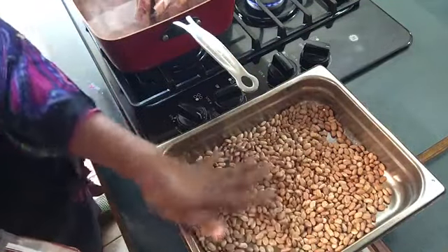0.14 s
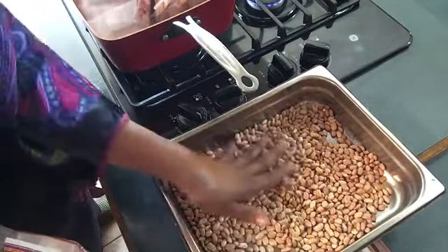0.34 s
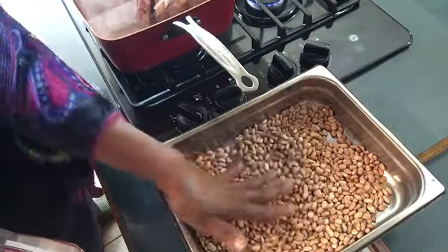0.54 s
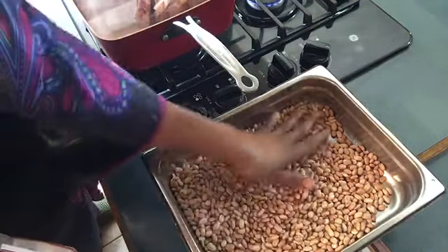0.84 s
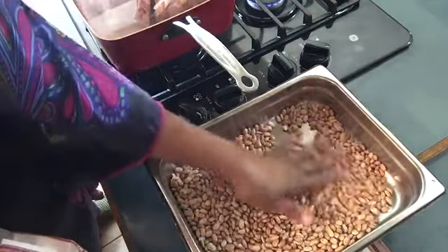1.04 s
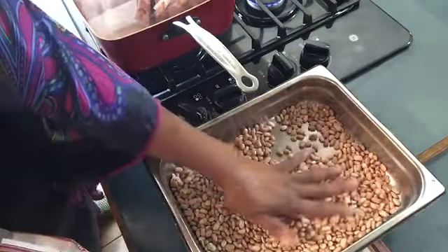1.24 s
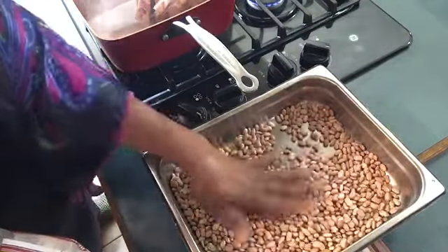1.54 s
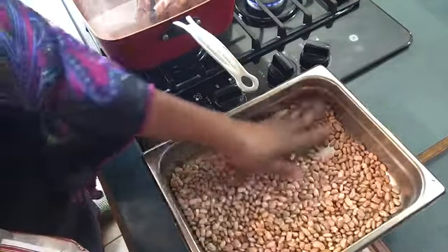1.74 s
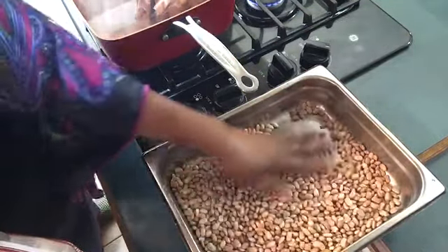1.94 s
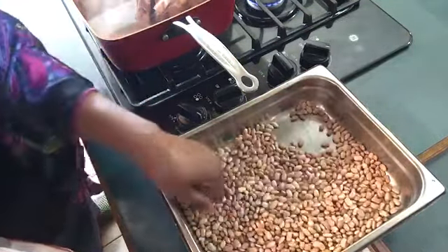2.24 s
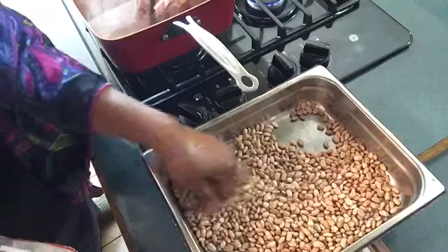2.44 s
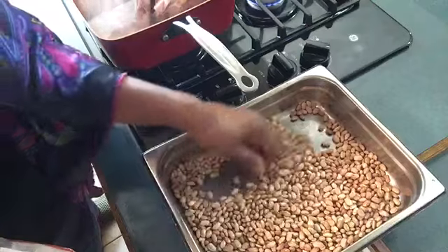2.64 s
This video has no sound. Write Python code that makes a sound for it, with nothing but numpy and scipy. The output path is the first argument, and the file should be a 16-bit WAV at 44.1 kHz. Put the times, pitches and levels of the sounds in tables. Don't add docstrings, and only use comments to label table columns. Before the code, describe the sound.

A hand stirs dry beans in a metal tray, with rustling clicks, sharp knocks and soft thuds

```python
import sys
import numpy as np
from scipy import signal
from scipy.fft import rfft, irfft
from scipy.io import wavfile
from scipy.ndimage import uniform_filter1d

SR = 44100
rng = np.random.default_rng(int(sys.argv[2]) if len(sys.argv) > 2 else 0)


def volts(x):
    e = np.asarray(x, float) / 20
    return 10 ** e


def wav_out(sig):
    wavfile.write(sys.argv[1], SR, np.round(np.clip(np.atleast_2d(sig).T, -1, 1) * 32767).astype(np.int16))


N = 123479

# [t/s, peak level/dB, length of push/s, boom f/Hz, boom level/dB]
LANDINGS = [
    (.202, -23.5, 0.034, 120.8, -22.5),
    (0.769, -20.5, 0.026, 123, -23.5),
    (1.757, -21.5, 0.025, 155.8, -18),
    (2.214, -25, 0.0059, 160, -45),
    (2.349, -24, 0.011, 160.5, -20.5),
]
SLOW_BELOW_HZ = 505


def rms_one(x):
    return x / np.sqrt(np.mean(x ** 2) + 1e-20)


def at_hz(points, hz):
    f, db = np.array(points)[:, 0], np.array(points)[:, 1]
    return np.interp(np.log(hz), np.log(f), db)


def drift(rate):
    r = np.exp(-2 * np.pi * rate / SR)
    noise = rng.standard_normal(N + SR)
    return rms_one(signal.lfilter([1], [1, -2 * r, r * r], noise)[SR:])


def resonate(x, hz, width_hz):
    r = np.exp(-np.pi * width_hz / SR)
    feedback = [1, -2 * r * np.cos(2 * np.pi * hz / SR), r * r]
    return signal.lfilter(np.array([1, 0, -1]) * (1 - r * r) / 2, feedback, x + 1e-18)


def ring(clicks, hz, t60):
    r = volts(-60 / (t60 * SR))
    w = 2 * np.pi * hz / SR
    return signal.lfilter([0, np.sin(w)], [1, -2 * r * np.cos(w), r * r], clicks + 1e-18)


def air():
    # [f/Hz, level/dB per Hz]
    air_colour = [(25, 15), (45, 1), (200, -0.5), (320, -1), (600, 1), (3000, -5), (6500, -18),
                  (10000, -30), (16000, -23)]
    hz = np.maximum(np.fft.rfftfreq(N, 1 / SR), 25)
    spectrum = rfft(rng.standard_normal(N)) * volts(at_hz(air_colour, hz))
    return volts(-58) * rms_one(irfft(spectrum, N))


def contacts(where, sizes, tilt_db, scatter, rattle, wander=.45, flip_every=1, rattle_db=-8.0):
    # [f/Hz, level/dB per Hz]
    bean_colour = [(210, -41), (350, -42), (398, -37), (575, -14), (2890, -1.5), (6640, -11.5),
                   (10400, -22), (12800, -17), (16000, -31)]
    # [f/Hz, width/Hz, boost/dB]
    pan_peaks = [(1114, 140, 2.5), (1670, 430, 6), (2820, 230, 5.5), (4094, 740, 6), (4780, 300, -5.5),
                 (5520, 360, 4.5), (6600, 310, 5.5), (11000, 1200, -2.5), (13800, 2000, -0.5)]
    bean_body_hz, tilt_pivot_hz = 1300, 3330
    ring_cycles, colour_scatter_db = 10.2, 5

    late = .0016 * rattle
    late[:, 0] = 0
    is_echo = late > 0
    touches = np.minimum(np.c_[where] + (late * SR).astype(int), N - 1).ravel()
    share = volts(rattle_db * is_echo - 5.0 * rattle * is_echo)
    share = share * np.sign(np.cos(1e3 * rattle * is_echo))

    out = np.zeros(N)
    for k, hz in enumerate(np.geomspace(380, 16000, scatter.shape[1])):
        mirrored_hz = max(hz, bean_body_hz ** 2 / hz)
        lean = tilt_db * np.clip(np.log2(mirrored_hz / tilt_pivot_hz), -1, 2)
        strength = sizes * volts(lean + colour_scatter_db * scatter[:, k])
        clicks = np.bincount(touches, (np.c_[strength] * share).ravel(), N)
        sign = (-1) ** (k // flip_every)
        out += sign * volts(at_hz(bean_colour, hz)) * resonate(clicks, hz, 1.71 * hz / ring_cycles)

    for hz, width_hz, db in pan_peaks:
        swell = np.clip(0.91 + wander * drift(9), 0, 1.3)
        out = out + (volts(db * swell) - 1) * resonate(out, hz, width_hz)
    return out


def stirring():
    # [t/s, stirring level/dB, treble of the contacts/dB re level]
    early_sweeps = [
        [(0, -40.5, -22), (.02, -42, -25), (.065, -58.5, -7), (.085, -53, -15), (.13, -53.5, -6),
         (.168, -55.5, -25)],
        [(.174, -45, -10), (.205, -39, -42), (.29, -40.5, -16.5), (.34, -33, -17.5), (.405, -27, -6),
         (.5, -38.5, -23), (.56, -47.5, -7.5), (.62, -59, -23), (.738, -60.5, -14)],
        [(.744, -36, -39), (.756, -32.5, -11), (.78, -39, -30), (.825, -48.5, -16)],
        [(.86, -38, -31), (.89, -29, -14.5), (.98, -33, -14), (1.25, -38.5, -22), (1.39, -36.5, -18),
         (1.56, -48.5, -19), (1.63, -60, -17), (1.665, -56, -17), (1.688, -42, -35)],
    ]
    later_sweeps = [
        [(1.69, -55, -2), (1.696, -36.5, -19), (1.746, -40.5, -25), (1.81, -39, -19)],
        [(1.81, -43, -11), (1.816, -31.5, 0), (1.828, -31, -20), (1.866, -33, -7.5), (1.92, -27.5, -16.5),
         (1.998, -38, -25.5), (2.144, -53, -27), (2.19, -59, -48), (2.194, -36, -19)],
        [(2.194, -55, -28), (2.216, -29.5, -15), (2.24, -36, -10), (2.256, -47, -8), (2.288, -52.5, -28),
         (2.296, -51.5, 9)],
        [(2.296, -42, -6), (2.356, -33.5, -16), (2.38, -27.5, -3), (2.436, -33.5, -17), (2.528, -29.5, -19.5),
         (2.688, -36, -17.5), (2.774, -45.5, -29), (2.8, -47, -28)],
    ]
    contacts_per_s, rate_follows = 5000, .4
    clump_db, size_spread_db = .85, 3.9

    s, level, treble = np.concatenate(early_sweeps + later_sweeps).T
    t = np.arange(N) / SR
    level, treble = np.interp(t, s, level), np.interp(t, s, treble)
    busier_db = rate_follows * (level - level.mean())
    rate_db = busier_db + clump_db * (drift(12) + drift(60))
    chance = rng.random(N)
    size = rng.exponential(1, N)
    sign = rng.choice([-1, 1], N)
    scatter = rng.standard_normal((N, 24))
    rattle = rng.exponential(1, (N, 4))

    where = np.flatnonzero(chance < contacts_per_s * volts(rate_db) / SR)
    big = np.minimum(size[where], 3.1)
    thin_db = -busier_db[where] / 2
    sizes = sign[where] * volts(size_spread_db * big + thin_db + level[where])
    tilt_db = 0.36 * (treble[where] + 13) - .5 * (big - 2.5)
    rustle = contacts(where, sizes, tilt_db, scatter[where], rattle[where])
    overall = np.sqrt(np.mean(volts(2 * level)))
    return volts(2.5) * overall * rms_one(rustle)


def knocks():
    # [t/s, peak level/dB, body/dB re treble]
    bean_knocks = [(0.0785, -23.5, 20), (0.1047, -25, -10), (0.1272, -20, -8.5), (0.1725, -36, -17),
                   (0.1858, -24, -26), (0.2558, -19, -12), (0.3408, -18.5, 17), (0.6388, -27, 5),
                   (0.7534, -22, -2), (0.8911, -10, -12), (0.92, -14, 21.5), (1.032, -21, 38.5),
                   (1.05, -17, -17), (1.126, -16.5, -47), (1.323, -23.5, -7), (1.479, -28, 16),
                   (1.5404, -15.5, -10), (1.562, -22, 0), (1.698, -12, 18), (1.7119, -18.5, 10),
                   (1.7384, -17.5, -1), (1.8167, -5, -18), (1.849, -12, -14), (1.9107, -15.5, 16),
                   (1.982, -20.5, -13),
                   (0.6809, -40, 24), (0.7113, -37, 22), (1.072, -15.5, 6), (1.2182, -17.5, -22),
                    (1.382, -25, 9.5), (1.929, -20, 11), (2.0677, -23.5, 9), (2.1663, -26, 16),
                    (2.1974, -24, 10), (2.2115, -31, -11), (2.2243, -16, -13), (2.2982, -21.5, -1),
                    (2.3703, -16.5, -17), (2.3857, -6, -12), (2.4064, -31, -19), (2.4284, -16.5, -5),
                    (2.446, -11, -4), (2.4543, -13, -4), (2.5103, -14.5, 7), (2.69, -13, -6),
                   (0.0204, -34, 0), (0.0998, -29.5, -5), (0.1989, -22, 7), (0.2103, -25, 8),
                   (0.396, -11.5, -3), (0.495, -23, -0.5), (0.5221, -23.5, 0.5), (0.5264, -20, 11),
                   (0.5616, -26.5, 13.5), (0.8616, -24, 0), (0.948, -8.5, -2.5), (0.9966, -23, 4),
                   (1.0207, -18, 12), (1.3084, -23, 0), (1.574, -33, 0), (1.644, -37, 0), (1.7578, -17, 6),
                   (1.7874, -18.5, -8), (1.8266, -23, 0), (1.88, -17, -7), (2.095, -25.5, 12),
                   (2.123, -25.5, 19), (2.3046, -27, 6), (2.3236, -23, -6), (2.5501, -11.5, 1),
                   (2.5646, -14, 1.5), (2.5726, -26, 0), (2.6234, -11, 3.5), (2.6641, -16, 3),
                   (2.7296, -29, 3), (2.7455, -18, 15), (2.7551, -21, 15), (2.776, -22.5, 2)]
    s, db, body_db = np.transpose(bean_knocks)
    count = len(s)
    scatter = .5 * rng.standard_normal((count, 24))
    rattle = rng.exponential(1.4, (count, 24))
    tilt_db = 0.47 * (-1 - body_db)
    dry_hit = dict(wander=0, flip_every=2, rattle_db=-7.5)

    apart = N // count
    alone = contacts(apart * np.arange(count), 1., tilt_db, scatter, rattle, **dry_hit)
    peaks = np.abs(alone[:apart * count]).reshape(count, apart).max(axis=1)
    sizes = volts(db - 2.58) / peaks
    return contacts((s * SR).astype(int), sizes, tilt_db, scatter, rattle, **dry_hit)


def pushes(hz):
    start, db, length = [np.c_[column] for column in np.transpose(LANDINGS)[:3]]
    age = np.maximum(np.arange(N) / SR - start, 0)
    rise = np.minimum(age * hz / 2.44, 1)
    fade = np.exp(-age / length / (SLOW_BELOW_HZ / hz) ** 0.59)
    return np.sum(volts(db - 18.5) * rise * fade, axis=0)


def pan_floor(stir):
    # [f/Hz, level/dB, time to fall 60 dB/s]
    floor_tones = [(58, -25.5, 0.49), (87.5, -11.5, 0.063), (118, -17, 0.17), (173, -4, 0.082),
                   (224, -7.5, 0.075), (252, -15, 0.044), (306.2, -3.5, 0.095), (339.6, -6.5, 0.11),
                   (464, -1.5, 0.041), (579.6, -0.5, 0.079), (692, 2, 0.043), (868, -10, 0.036),
                   (1002.7, -1.5, 0.17), (1322, 8, 0.033)]
    pushes_per_s, boom_rise_s, boom_t60_s = 600, 0.031, 0.17
    t = np.arange(N) / SR
    bumps = (rng.random(N) < pushes_per_s / SR) * 1.
    bumps[(np.array(LANDINGS)[:, 0] * SR).astype(int) + 90] = 1.8
    shake = volts(-45) * uniform_filter1d(np.abs(stir), size=441)

    out = np.zeros(N)
    for hz, db, t60 in floor_tones:
        force = pushes(hz) * bumps + shake * min(hz / SLOW_BELOW_HZ, 1)
        out = out + volts(db) * ring(force * rng.standard_normal(N), hz, t60)

    for s, db, length, hz, boom_db in LANDINGS:
        age = np.maximum(t - s, 0)
        rise = np.minimum(age / boom_rise_s, 1)
        fade = volts(-60 * np.maximum(age - boom_rise_s - length / 2, 0) / boom_t60_s)
        pitch = hz * (1 + 0.3 * np.exp(-age / 0.011))
        hum = volts(1.3 * drift(40)) * np.sin(2 * np.pi * np.cumsum(pitch) / SR)
        out = out + volts(db + boom_db) * rise * fade * hum
    return signal.sosfilt(signal.butter(1, [30, 1560], "band", fs=SR, output="sos"), out)


def kitchen(x):
    room_t60_s, room_db, room_cut_hz = .16, -10, 9000
    t = np.arange(SR // 2) / SR
    tails = rng.standard_normal((8, len(t))) * volts(-60 * t / room_t60_s) * (t > .004)
    tails = signal.sosfilt(signal.butter(1, room_cut_hz, fs=SR, output="sos"), tails)
    spot = np.repeat(rng.integers(0, 8, N // 256 + 1), 256)[:N]
    wet = np.zeros(N)
    for k, tail in enumerate(tails):
        here = uniform_filter1d(1. * (spot == k), size=128)
        wet = wet + signal.fftconvolve(here * x, tail)[:N]
    return volts(room_db) * wet / np.sqrt(np.sum(tails ** 2) / len(tails))


def scene():
    stir = stirring()
    pan = stir + knocks() + pan_floor(stir)
    return (pan + kitchen(pan) + air())[None]


def roll_off(x):
    return signal.sosfilt(signal.butter(12, 15850, fs=SR, output="sos"), x)


def record(dry):
    no_rumble = signal.sosfilt(signal.butter(4, 34, "high", fs=SR, output="sos"), dry)
    mix = signal.sosfilt(signal.cheby2(10, 50, 16750, fs=SR, output="sos"), no_rumble)
    return roll_off(mix)


dry = scene()
out = record(dry)
wav_out(out)
```